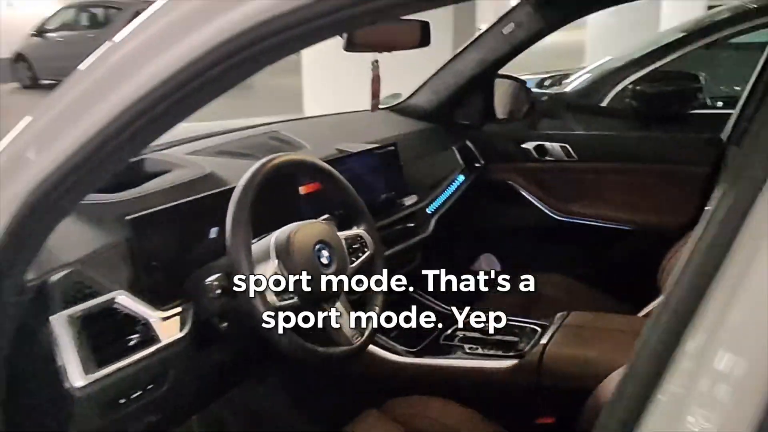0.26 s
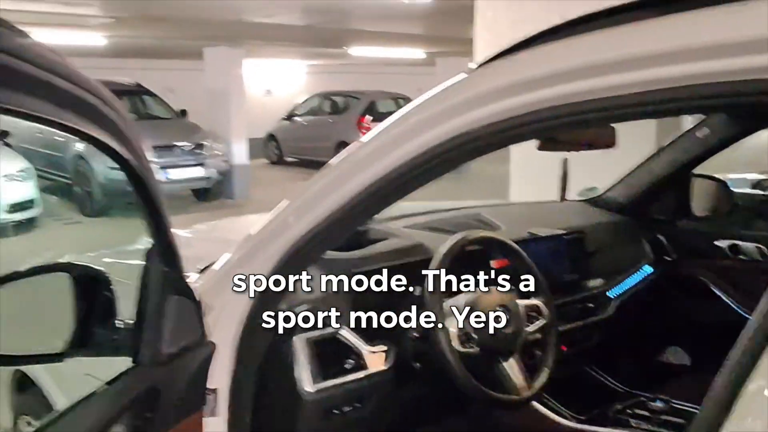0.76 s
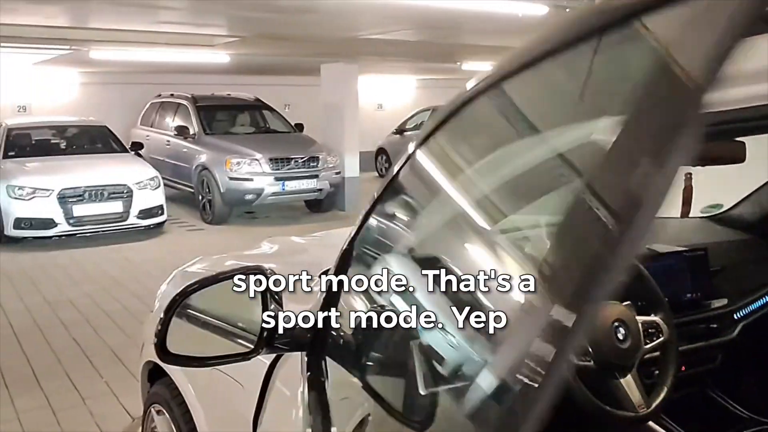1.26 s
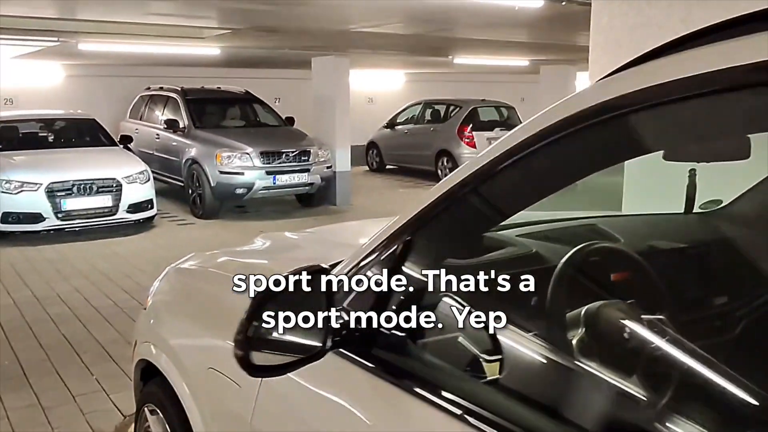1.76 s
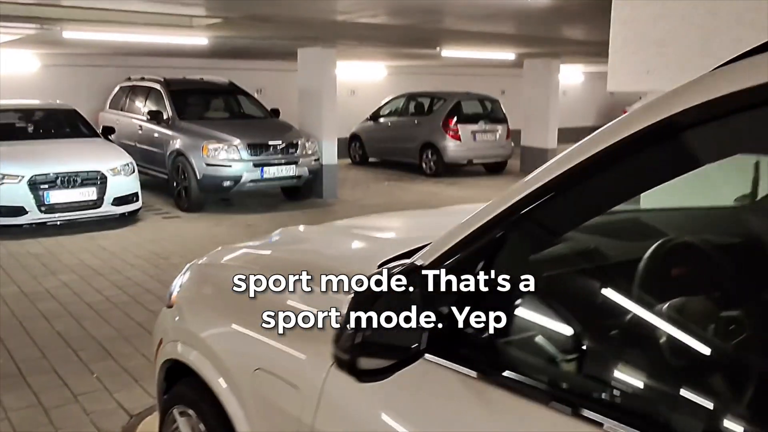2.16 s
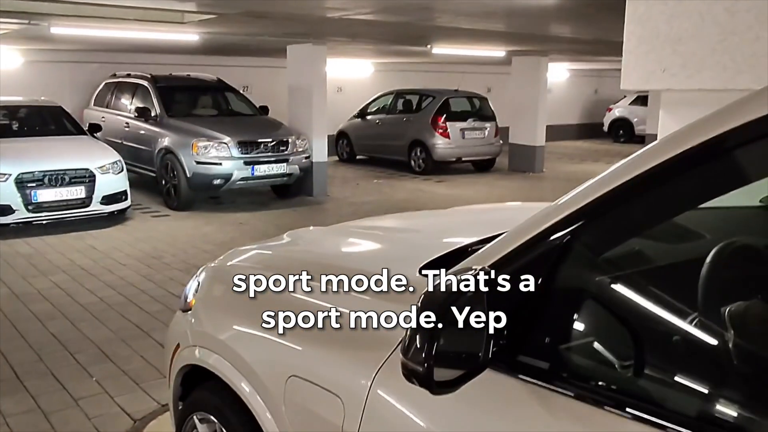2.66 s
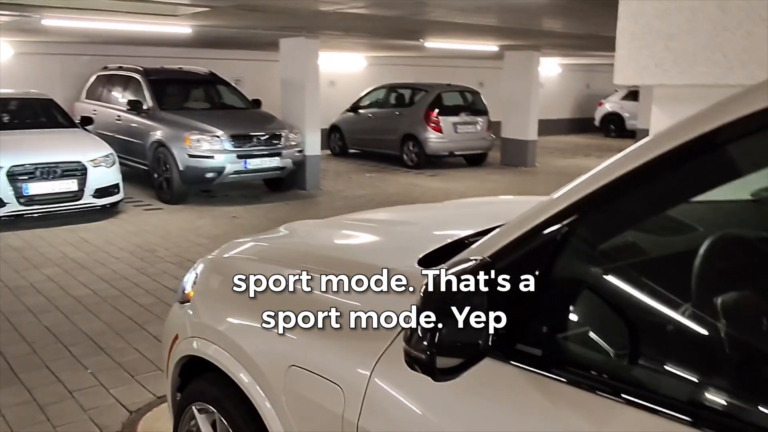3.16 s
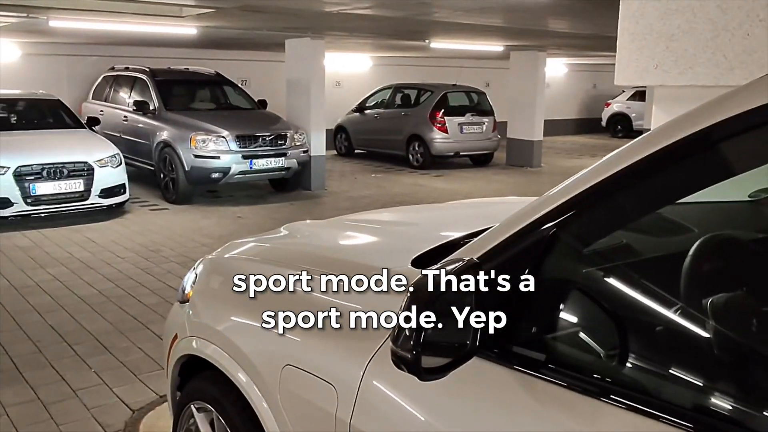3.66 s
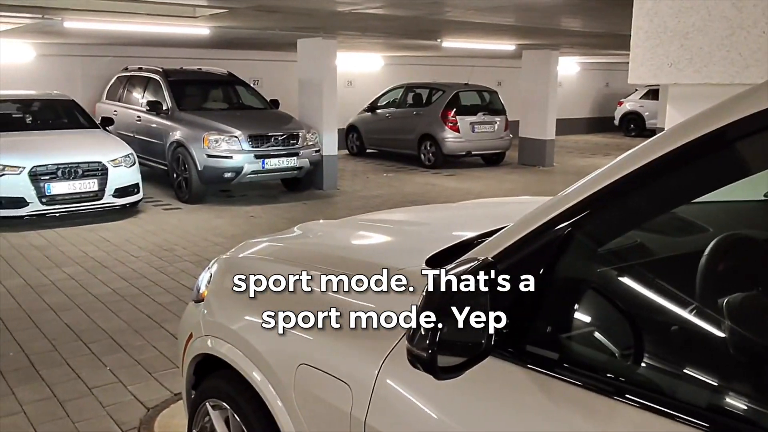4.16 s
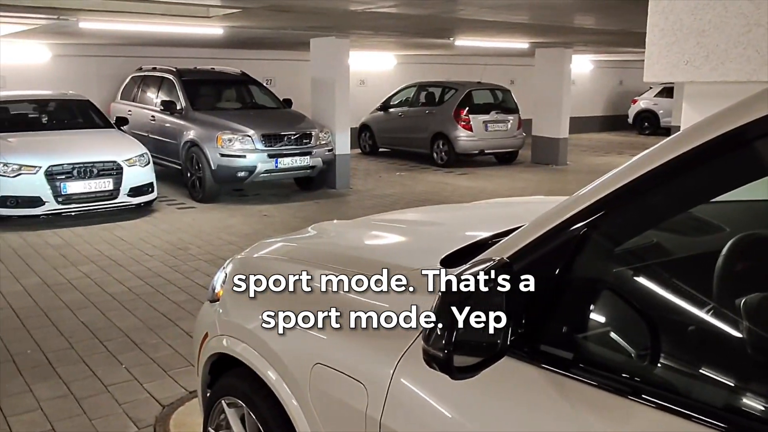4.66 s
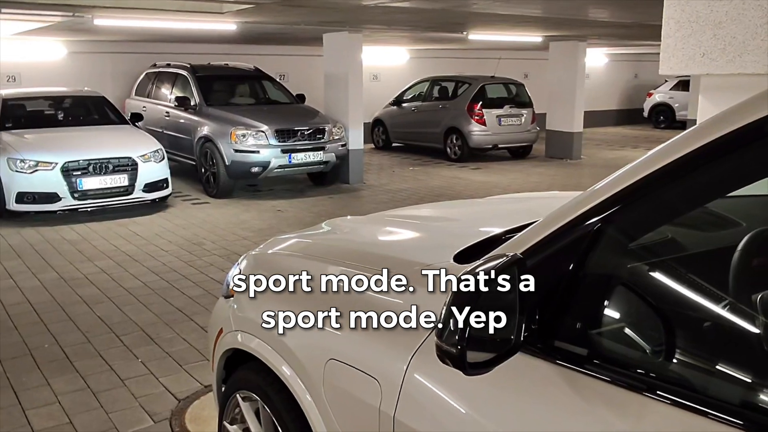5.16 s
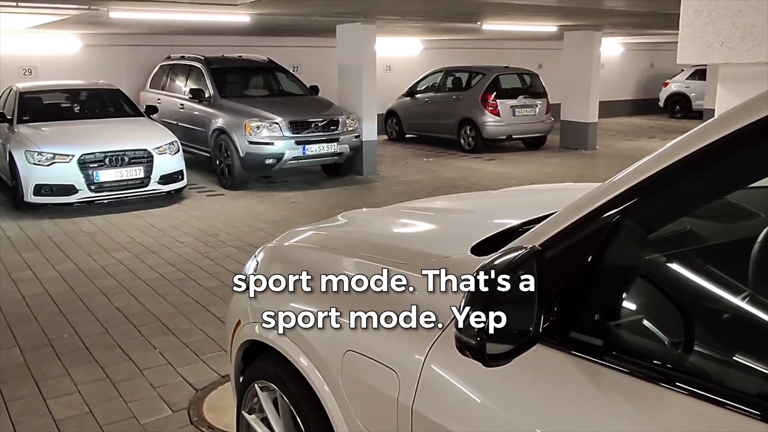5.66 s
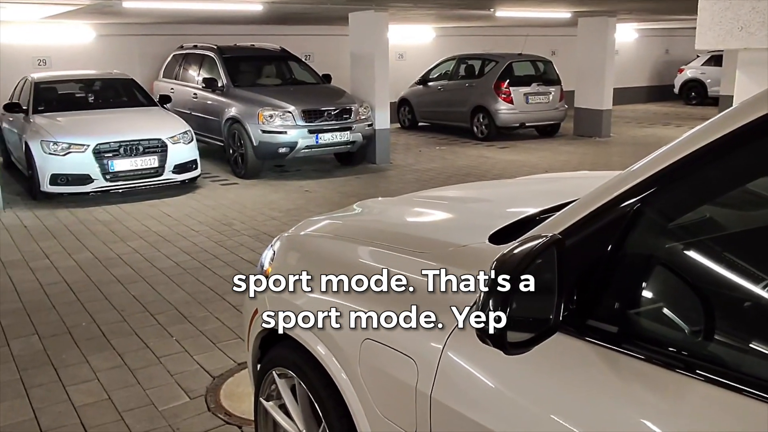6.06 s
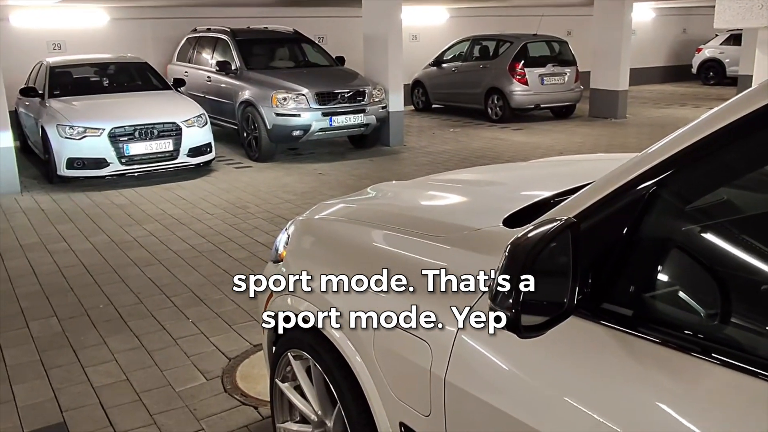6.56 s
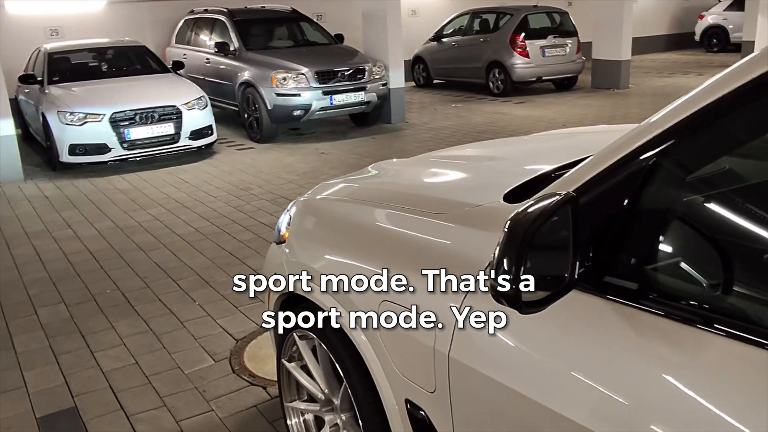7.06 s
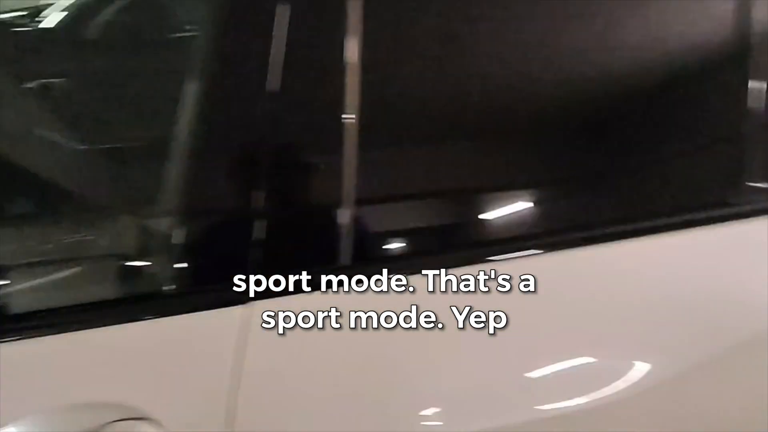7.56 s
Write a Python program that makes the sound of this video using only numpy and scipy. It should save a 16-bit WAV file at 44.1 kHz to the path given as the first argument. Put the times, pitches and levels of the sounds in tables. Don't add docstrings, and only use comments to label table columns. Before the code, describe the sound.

Small handling knocks and scuffs, one heavy car door slam, a faint low hum and clunk, then a mechanical air compressor whining to the end.

```python
import sys
import numpy as np
from scipy import signal
from scipy.fft import rfft, irfft, next_fast_len
from scipy.io import wavfile
from scipy.ndimage import map_coordinates

SR = 44100
rng = np.random.default_rng(int(sys.argv[2]) if len(sys.argv) > 2 else 0)


def output_pcm(signal):
    pcm = np.clip(np.atleast_2d(signal).T, -1, 1) * 32767
    wavfile.write(sys.argv[1], SR, np.round(pcm).astype(np.int16))


def invert_db(x):
    u = np.asarray(x, float) / 20
    return 10 ** u


N = 343980

# pitch_hz, level_db_per_hz
HISS = [(120, -41.5), (200, -18.5), (240, -12), (621, -6.5), (1270, -10), (1410, -11.5), (1640, -10),
        (4480, -12), (6690, -11), (9300, -22), (10600, -33.5), (12500, -15.5), (15800, -19)]
HISS_DB = -70.5
# start_s, level_db
BACKGROUND_LEVEL = [(0, 2), (2.56, -2.4), (2.63, -2.5), (2.9, 2), (3.1, 0.2), (7.8, 1.2)]
# pitch_hz, likeness_0_to_1
ALIKE = [(60, 0.19), (240, 0.11), (950, 0.19), (3770, 0.0086), (15000, 0.049)]
# pitch_hz, level_db
LEAN = [(60, -8.5), (950, 0), (3770, -2), (15000, -1)]
# pitch_hz, fade_60db_s
GARAGE = [(60, 0.36), (300, 0.28), (2000, 1), (4500, 0.65), (12000, 0.03)]
# pitch_hz, fade_60db_s
UNDERSIDE = [(300, 0.29), (1500, 0.96), (6000, 0.0065)]
# pitch_hz, level_db
PORTS = [(20, 5.5), (7500, -3.5), (9500, -14.5), (10800, -26), (11900, -11), (13000, -11.5), (16000, -12.5)]
# start_s, left_minus_right_db
CAMERA_SWING = [(3.05, -1), (3.33, -1), (4.37, -2), (7.11, -1), (7.24, 0.5), (7.6, 7.5), (7.8, 6.5)]

# peak_s, rise_s, fall_s, rumble_db, shuffle_db
MOVES = [(0.1, 0.69, 0.37, -60.5, -72.5), (0.7, 0.42, 0.12, -55.5, -60.5), (1.15, 0.32, 0.37, -57, -65),
         (1.76, 0.053, 0.2, -37.5, -38.5), (1.92, 0.048, 0.106, -60.5, -53), (2.1, 0.5, 0.57, -54, -69.5),
         (2.38, 0.29, 0.29, -64.5, -71.5), (2.57, 0.26, 0.041, -62.5, -71),
         (3.05, 0.44, 0.56, -71.5, -72.5), (4.33, 0.41, 0.47, -62.5, -71.5), (5.04, 0.31, 0.53, -66, -59),
         (5.4, 0.33, 0.27, -82, -72), (6.1, 0.36, 1, -79, -76.5), (7.06, 0.61, 0.45, -73.5, -74),
         (7.75, 0.4, .5, -70.5, -80.5)]
REST_RUMBLE_DB, REST_SHUFFLE_DB = -77, -79
# peak_s, rise_s, fall_s, level_db, dull_part_db
SCUFFS = [(0.03, 0.95, 0.26, -60, 10.5), (0.237, 0.083, 0.086, -52.5, -40),
          (0.395, 0.023, 0.083, -49.5, -29), (.447, 0.12, 0.012, -64, -20), (1.93, 0.12, 0.32, -66, 8),
          (2.19, 0.059, 0.036, -70.5, -14), (2.35, 0.31, 0.25, -68.5, 12), (2.47, 0.11, 0.5, -66.5, 9)]
# pitch_hz, level_db_per_hz
SCUFF_BRIGHT = [(290, -78), (500, -6), (944, -25), (1040, -6.5), (1480, -5), (2090, -5.5), (6450, -4.5),
                (10400, -21), (13100, -15), (15800, -11.5)]
# pitch_hz, level_db_per_hz
SCUFF_DULL = [(300, -32.5), (600, -3), (850, 4.5), (1200, -8.5), (2000, -38.5)]
# pitch_hz, level_db_per_hz
SHUFFLE = [(59, -25), (100, -3), (306, -7), (513, -16.5), (600, -18.5), (780, -33), (1320, -120)]
# pitch_hz, level_db_per_hz
RUMBLE = [(15, -48), (32, -7.5), (50, 12.5), (113, 0.5), (150, -6), (200, -50)]

# start_s, level_db, pitch_hz, fade_60db_s
BUMPS = [(1.061, -31.5, 179, 0.14), (1.09, -45, 75.6, 0.34), (1.337, -42.5, 170, .1), (0.601, -49, 62, .5),
         (.688, -58, 70, .3), (1.419, -54, 915, 0.089), (1.766, -19.5, 110, 0.18), (4.238, -38.5, 71, 0.26),
         (4.915, -43.5, 95, 0.13), (5.03, -58, 280, 0.42), (5.09, -62, 70, 0.18), (1.6, -58, 160, 0.22),
         (4.9, -59, 308, .5), (4.9, -59, 214, 0.49)]

# start_s, thud_db, knock_db, knock_hz, click_db
TAPS = [(0.379, -51, -42, 1280, -68), (0.392, -56, -57, 1170, -39), (0.411, -45.5, -47, 1330, -59),
        (0.445, -64, -67, 1490, -44), (0.587, -59, -39, 396, -48), (0.595, -39.5, -34, 480, -38),
        (0.681, -47, -56, 1080, -43.5), (0.756, -58, -47.5, 920, -47.5), (1.009, -62, -40, 360, -50),
        (1.219, -63, -56.5, 557, -62.5), (1.415, -58, -55.5, 870, -55.5), (1.418, -48.5, -44.5, 850, -45.5),
        (2.187, -48, -75, 462, -58), (2.48, -50, -58.5, 986, -56.5), (2.913, -46.5, -68, 367, -53.5),
        (1.343, -44, -42.5, 353, -52), (2.971, -41.5, -46.5, 415, -51), (4.849, -42, -57, 607, -56)]
# start_s, thud_db, knock_db, knock_hz
THUMPS = [(0.026, -55, -52, 357), (0.865, -98, -48, 410), (0.99, -45, -48, 389), (1.012, -42, -46, 359),
          (1.058, -37, -37.5, 353), (1.065, -32, -29, 596), (1.331, -44.5, -48.5, 440),
          (1.363, -49, -50.5, 333), (1.753, -30.5, -9.5, 493), (1.763, -17.5, -12.5, 530),
          (1.577, -42.5, -78.5, 368.8), (1.606, -42.5, -67.5, 353)]
# start_s, thud_db, knock_db, knock_hz
CLUNKS = [(2.946, -37.5, -50, 357), (3.027, -44.5, -47, 349), (3.045, -47.5, -67, 487),
          (4.18, -42, -59.5, 350), (4.227, -37.5, -45, 266), (4.24, -34.5, -36.5, 296),
          (4.251, -42, -46, 650), (4.277, -43, -66, 250), (4.916, -42.5, -43.5, 307),
          (5.438, -50, -68, 624)]
THUMP_CLICK_DB, CLUNK_CLICK_DB = -40, -15.5
# start_s, peak_db, pitch_hz, fade_60db_s
TICKS = [(0.391, -60, 5600, 0.038), (0.595, -34, 7950, 0.018), (0.681, -37.5, 5800, 0.084),
         (0.7545, -37, 5430, 0.028), (.799, -55, 3200, 0.022), (.984, -58, 3100, 0.026),
         (1.0194, -63, 4160, 0.035), (1.066, -48.5, 1900, 0.078), (2.972, -56, 1900, .07),
         (1.246, -53.5, 3120, 0.031), (1.411, -54, 4000, 0.068), (1.419, -49.5, 4290, 0.044),
         (1.746, -25, 5670, 0.026), (1.7628, -18.5, 6450, 0.041), (1.9544, -53, 4990, 0.064),
         (2.183, -48, 3970, 0.063), (2.9144, -49, 4050, 0.051), (2.9282, -41.5, 4430, 0.046),
         (4.8484, -62, 5460, 0.096), (6.331, -45.5, 6450, 0.12)]
# start_s, peak_db, fade_60db_s
METAL_SNAPS = [(1.772, -28, 0.041), (1.784, -29.5, 0.078), (1.817, -42, 0.05), (1.952, -40.5, 0.044),
               (2.9274, -38, 0.054)]
# start_s, level_db, pitch_hz
PUSHES = [(1.0654, -34, 517), (1.343, -50, 446), (1.7571, -10, 475), (2.972, -49, 1396),
          (4.852, -45.5, 525)]

# start_s, length_s, pitch_hz, level_db, sag_db_per_s, release_s
HUM = [
    (2.128, 0.9, 118.6, -56.5, -1.5, .05),
    (4.227, 0.47, 118.6, -53.5, 19, 0.21),
]
HUM_RISE_S, HUM_WAVER_HZ, HUM_WAVER_DB = .07, .8, .7
# start_s, level_db
BLEED = [(4.82, -90), (4.85, -58.5), (4.95, -64), (5.2, -64), (5.3, -69), (5.36, -88)]
# pitch_hz, width_hz, level_db
NOZZLE = [(704, 600, 7), (2480, 340, 9.5)]

# start_s, turns_per_s
SHAFT = [(3.085, 33.4), (3.187, 41.5), (3.297, 46.6), (3.408, 51.3), (3.604, 59.5), (3.7, 59.45),
         (3.93, 58.6), (4.36, 57.7), (4.58, 57.3), (5.0, 56.85), (5.5, 56.25), (6.03, 55.7), (6.3, 55.4),
         (6.45, 54.3), (6.54, 54.0), (6.66, 54.6), (6.79, 54.8), (7.25, 54.42), (7.57, 53.8), (7.8, 53.7)]
FULL_SPEED = 57
FIRST_SNAP_S, FILL_FROM_S, FILL_S = 3.0825, 4.75, 2
# start_s, level_db
HOUSING_LEVEL = [(3.09, -71), (3.2, -69.5), (3.31, -66.5), (3.42, -59.5), (3.61, -56), (3.75, -58.5),
                 (3.93, -58), (4.36, -57.5), (4.58, -57), (5.0, -58.5), (5.5, -62.5), (6.03, -60),
                 (6.3, -63.5), (6.54, -64), (6.7, -62), (7.25, -59), (7.55, -63.5), (7.8, -62.5)]
# pitch_hz, width_hz, level_db
HOUSING = [(1132, 25.5, 5), (1176, 15.3, -4)]
BRACKET = [(882.5, 31, -5), (980.3, 32, 3.5), (1059, 57, -2.5), (931, 22, -7.5)]
CRANKCASE = [(1312, 30, 0.5), (1372, 39, -1), (1401, 32, -6.5), (1452, 35, -10.5), (1242, 16, -9)]
COVER = [(1810, 40, -5), (1863, 30, -4), (1958, 50, -1), (2012, 37, -8.5), (2112, 36, -6.5),
         (2170, 36, -4.5)]
SHIELD = [(1588, 50, -7), (1603, 31, -3), (1700, 36, -7.5), (1746, 32, -3), (1919, 39, -3.5)]
TANK = [(410, 31, -12.5), (466, 21, -12), (510, 41, -20.5), (557, 40, -7), (629, 32, 3), (684, 29, 0),
        (720, 56, -7), (797, 40, -16), (828, 66, -13)]
FINS = [(2362, 21, -5.5), (2427, 25, -5.5), (2540, 16, 1), (2678, 31, -1), (2877, 25, -1), (2920, 30, 0.5),
        (3100, 54, -1.5)]
HEAD = [(3370, 54, 1.5), (3510, 18, 3.5), (3686, 66, -1), (4000, 41, -3), (4070, 28, -14), (4290, 24, 2),
        (4530, 37, -1), (4690, 23, 5), (5190, 63, -1), (5270, 32, -23), (5550, 27, -2.5), (5750, 20, -6)]
FLANGE = [(1184, 30, -1.5), (1240, 32, -8.5)]
# modes, full_speed_db, db_per_speed_doubling, full_pressure_db, blow_travel_s,
# db_per_db_of_camera_swing
PARTS = [
    (BRACKET, -61, 22.3, 0.77, 0.0093, 0),
    (CRANKCASE, -60.5, 18, -1.7, 0.004536, 0),
    (COVER, -66, 18, 3.65, 0.003038, -0.5),
    (SHIELD, -65, 21, -13.5, 0.00196, 0),
    (TANK, -69, 25, 3.5, 0.0012, 0),
    (FINS, -64.5, 10, -0.29, .0065, 0.37),
    (HEAD, -64.5, 16.5, 1, .011, 0.24),
    (FLANGE, -77, 15, 14, 0.00296, -.2),
]
# start_s, bracket_db, crankcase_db, cover_db
PART_LEVEL = [(3.1, 4.5, 5, 4), (3.199, 1, 1, 2.5), (3.35, -2, -3, -4), (3.62, -6, -1, 0),
              (3.85, -1.5, 0.5, 1), (4.071, 2, -0.5, -0.5), (4.35, 0, -3, .3), (4.75, -1, .3, -2),
              (5.2, -1, 2, -1), (5.6, 0.5, 1.3, -1.5), (5.9, 0.3, -0.5, 0), (6.381, 0.2, -1.5, 1.5),
              (6.5, 0, 2, 1.5), (6.8, -1, 2.5, 1.5), (7.28, -1, 3, 3), (7.48, -1, 0, -2),
              (7.8, -1.3, -1.5, -0.5)]
# start_s, level_db
FINS_HEAD_LEVEL = [(3.1, 0), (3.5, 1.5), (3.8, 1), (4.3, -0.5), (5, 0), (6.2, 1), (6.9, 1.5), (7.15, 1.5),
                   (7.33, 3.5), (7.5, 0), (7.8, -.5)]
# pitch_hz, level_db_per_hz
INTAKE = [(250, -18), (550, -15.5), (800, -24), (1200, -10.5), (1550, -16), (2300, -18.5), (4050, -26),
          (4800, -23), (7000, -25.5), (9500, -37.5), (12400, -89)]
AIR_DB, AIR_GROWS = -63.5, 12

# start_s, peak_db, crack_db
SLAM = [
    (1.733, -21.5, -23.5),
    (1.742, -10, -42),
    (1.745, -1, -24.5),
    (1.751, -3.5, -23),
    (1.756, 0, -28.5),
    (1.762, -4.5, -27),
    (1.771, -7.5, -16.5),
    (1.788, -13, -30),
]
# pitch_hz, level_db, fade_60db_s
PANEL = [(198, -7, 0.24), (333, 0.5, 0.038), (488, -3, 0.19), (573, -9.5, 0.058), (594, -4.5, 0.1),
         (630, -52.5, .3), (728, -34.5, 0.083), (1060, -16, 0.16), (1680, -27.5, 0.09), (2080, -29.5, .1),
         (2410, -28.5, .1), (3800, -32.5, 0.059), (5440, -28.5, .06), (6800, -31, 0.073)]
# pitch_hz, level_db_per_hz
BLOW = [(20, -38.5), (40, -14), (62, -12), (85, -16), (135, -1), (300, -12.5), (520, -5), (750, -20.5),
        (1500, -20.5), (2500, -20.5), (4000, -36.5), (6500, -49.5), (15500, -72)]
# pitch_hz, fade_60db_s
BLOW_FADE = [(40, .5), (120, 0.31), (500, 0.077), (2000, 0.074), (6000, 0.11), (12000, 0.034)]
# pitch_hz, level_db, fade_60db_s
CABIN = [(32.9, -27, 0.93), (47.7, -22, 0.46), (62.7, -17.5, 0.44), (99.8, -16, .25), (110, -20, 0.22),
         (128.5, -18.5, .35), (146.3, -18.5, 0.33), (649, -55, 1.22)]
SHUT_S = 1.756


def unit(x):
    return x / np.sqrt(np.mean(x ** 2) + 1e-20)


def along(points, hz):
    f, v = np.transpose(points)
    return np.interp(np.log(hz + 1), np.log(f + 1), v)


def curves(rows):
    s, *columns = np.transpose(rows)
    return [np.interp(np.arange(N) / SR, s, column) for column in columns]


def during(rows, fade):
    first, last = rows[0][0], rows[-1][0]
    return np.interp(np.arange(N) / SR, [first - fade, first, last, last + fade], [0, 1, 1, 0])


def wobble(rate):
    knots = rng.standard_normal(int(N * rate / SR) + 4)
    return map_coordinates(knots, [np.arange(N) * rate / SR])


def filtered(x, response):
    m = next_fast_len(x.shape[-1] + 8192)
    spectrum = rfft(x, m) * response(np.fft.rfftfreq(m, 1 / SR))
    return irfft(spectrum, m)[..., :x.shape[-1]]


def resonances(modes):
    def mode(f, c, w, db):
        return invert_db(db) * 1j * f * w / (c * c - f * f + 1j * f * w)
    return lambda f: sum((-1) ** k * mode(f, *row) for k, row in enumerate(modes))


def rush(spectrum, alike):
    def response(hz):
        turn = np.arccos(np.clip(along(alike, hz), -1, 1)) / 2
        return invert_db(along(spectrum, hz)) * [np.cos(turn), np.sin(turn)]
    mid, side = filtered(rng.standard_normal((2, N)), response)
    return unit(np.array([mid + side, mid - side]))


def fading(decays, spectrum, seconds):
    hz, t, z = signal.stft(rng.standard_normal((2, int(seconds * SR))), SR, nperseg=256)
    level_db = along(spectrum, hz)[:, None] - 60 * t / along(decays, hz)[:, None]
    tail = signal.istft(z * invert_db(level_db), SR, nperseg=256)[1]
    return tail / np.linalg.norm(tail[0])


def burst(out, s, db, hz, width, t60):
    t = np.arange(SR // 4) / SR
    band = resonances([(hz, width, 0)])
    noise = rng.standard_normal((2, len(t)))
    mid, side = filtered(noise, lambda f: band(f) ** 2 * invert_db(along(PORTS, f)))
    spread = np.clip(hz / 8000, 0, 1)
    shape = invert_db(db - 60 * t / t60) * (1 - np.exp(-t * hz * 3.3))
    sound = shape * unit(np.array([mid + spread * side, mid - spread * side]))
    return np.pad(sound, ((0, 0), (round(s * SR), N)))[:, :N] + out


def swell(s, rise, fall, db):
    t = np.arange(N) / SR - s
    return invert_db(db - 20 * np.where(t < 0, -t / abs(rise), t / abs(fall)))


def garage_echo(x, start, decays=GARAGE):
    tail = fading(decays, [(20, 0)], 0.93)
    tail = np.pad(tail, ((0, 0), (int(start * SR), 0)))
    return signal.fftconvolve(x[None], tail, axes=1)[:, :N]


def still_air():
    level = invert_db(HISS_DB + curves(BACKGROUND_LEVEL)[0] + 0.88 * wobble(2.5))
    return level * rush(HISS, [(300, 0.27), (3000, 0.12), (12000, 0.12)])


def person():
    rumble, shuffle = invert_db(REST_RUMBLE_DB), invert_db(REST_SHUFFLE_DB)
    for s, rise, fall, rumble_db, shuffle_db in MOVES:
        rumble = rumble + swell(s, rise, fall, rumble_db)
        shuffle = shuffle + swell(s, rise, fall, shuffle_db)
    out = rumble * invert_db(1.4 * wobble(10)) * rush(RUMBLE, [(50, 0.7)])
    out += shuffle * invert_db(2.6 * wobble(25)) * rush(SHUFFLE, [(200, 0.083)])
    bright = rush(SCUFF_BRIGHT, [(1000, 0.27), (8000, 0.19)])
    dull = rush(SCUFF_DULL, [(800, 0.31)])
    grain = invert_db(0.77 * wobble(170))
    for s, rise, fall, db, dull_db in SCUFFS:
        out += swell(s, rise, fall, db) * grain * (bright + invert_db(dull_db - 17) * dull)
    return out


def deep_thuds():
    out, t = np.zeros(N), np.arange(SR // 2) / SR
    for s, db, hz, t60 in BUMPS:
        tone = invert_db(db - 60 * t / t60) * np.sin(2 * np.pi * hz * t)
        out[round(s * SR):][:len(t)] += tone * (1 - np.exp(-t / 0.0027))
    return out


def knocks():
    out = np.zeros((2, N))
    padded = [(*row, row[1] + THUMP_CLICK_DB) for row in THUMPS]
    clunks = [(*row, row[1] + CLUNK_CLICK_DB) for row in CLUNKS]
    for s, thud_db, knock_db, hz, click_db in TAPS + padded + clunks:
        out = burst(out, s, thud_db - 8.0, 140, 150, 0.17)
        out = burst(out, s, knock_db - 5.5, hz, 0.38 * hz + 30, 0.063)
        out = burst(out, s, click_db - 8.5, 1700, 2700, 0.082)
    for s, db, hz, t60 in TICKS:
        out = burst(out, s, db - 12, hz, 3600, abs(t60) + 0.0039)
        out = burst(out, s, db - 17.0, 15000, 12000, abs(t60) + 0.0045)
    for s, db, t60 in METAL_SNAPS:
        out = burst(out, s, db - 9.5, 16000, 5000, t60)
    t = np.arange(SR // 10) / SR
    for s, db, hz in PUSHES:
        push = 3 * invert_db(db - 18.4 * t * hz) * np.sin(2 * np.pi * hz * t)
        out[:, round(s * SR):][:, :len(t)] += push
    return out


def valve():
    out, t = np.zeros(N), np.arange(N) / SR
    for s, length, hz, db, sag_db, release in HUM:
        turn = 2 * np.pi * np.cumsum(hz + HUM_WAVER_HZ * wobble(11.3)) / SR
        held = np.clip(np.minimum((t - s) / HUM_RISE_S, (s + length - t) / release), 0, 1)
        level = invert_db(db - sag_db * (t - s) + HUM_WAVER_DB * wobble(9.5))
        out += held * level * (np.sin(turn) + 0.037 * np.sin(2 * turn))
    jet = unit(filtered(rng.standard_normal(N), lambda f: resonances(NOZZLE)(f) ** 2))
    return out + during(BLEED, .01) * invert_db(curves(BLEED)[0]) * jet


def compressor():
    speed, housing_db = curves(SHAFT)[0], curves(HOUSING_LEVEL)[0]
    swing_db = curves(CAMERA_SWING)[0]
    on = during(SHAFT, 0.0095)
    pressure = np.clip((np.arange(N) / SR - FILL_FROM_S) / FILL_S, 0, 1)
    effort = np.log2(speed / FULL_SPEED)
    turn = 2 * np.pi * np.cumsum(speed) / SR + 0.0015 * wobble(30)
    turn = turn - turn[round(FIRST_SNAP_S * SR)]
    snaps = np.exp(9000 * (np.cos(turn) - 1)) * invert_db(0.19 * wobble(50))

    def ring(modes, late=0):
        blow = resonances([(1500, 12000, 0)])
        part = resonances(modes)
        return unit(filtered(snaps, lambda f: part(f) * blow(f) * np.exp(-2j * np.pi * f * late)))

    swing = np.clip(swing_db, 0, None)
    body = invert_db(housing_db) * ring(HOUSING)
    part_levels = curves(PART_LEVEL) + [0, 0] + 2 * curves(FINS_HEAD_LEVEL) + [0]
    for (modes, db, grows_db, full_db, late, shade), part_db in zip(PARTS, part_levels):
        level_db = db + grows_db * effort + full_db * pressure + shade * swing + part_db
        body = body - invert_db(level_db) * ring(modes, late)
    body = on * body
    puffs = 1 + 0.18 * np.cos(turn - 1.2) + 0.033 * np.cos(2 * turn)
    air_level = invert_db(AIR_DB + AIR_GROWS * effort + 1.83 * wobble(12))
    air = on * air_level * puffs * rush(INTAKE, ALIKE)
    heard = body + invert_db(-16) * garage_echo(body, .002, UNDERSIDE)
    heard = heard + invert_db(-19) * garage_echo(body, .02) + air
    heard = heard * invert_db(swing_db * [[.5], [-.5]])
    delay = 5.5 / SR * np.array([[-.5], [.5]])
    return filtered(heard, lambda hz: invert_db(along(LEAN, hz) * [[.5], [-.5]])
                    * np.exp(2j * np.pi * hz * delay))


def door():
    out, t = np.zeros((2, N + SR)), np.arange(SR) / SR
    latch = resonances([(6000, 5000, 0)])
    for s, db, crack_db in SLAM:
        ring = 0
        for hz, level, t60 in PANEL:
            ring = ring + invert_db(level + rng.normal(0, 2.1) - 60 * t / t60) * np.sin(2 * np.pi * hz * t)
        ring = invert_db(-10.5) * ring * (1 - np.exp(-t / 0.00096))
        mid, side = fading(BLOW_FADE, BLOW, 1)[:, :SR]
        side = filtered(side, lambda f: f ** 2 / (f ** 2 + 1500 ** 2))
        thud = 12 * np.array([mid - 0.18 * side, mid + 0.18 * side]) * (1 - np.exp(-t / 0.00029))
        noise = rng.standard_normal((2, SR)) * invert_db(-60 * t / 0.068)
        crack = filtered(noise, lambda f: latch(f) * invert_db(along(PORTS, f)))
        crack = invert_db(crack_db + 14.5) * crack * invert_db([[-4], [4]])
        out[:, round(s * SR):][:, :SR] += invert_db(db - 13.0) * (ring + thud + crack)
    boom = sum(invert_db(level - 60 * t / t60) * np.sin(2 * np.pi * hz * t) for hz, level, t60 in CABIN)
    out[:, round(SHUT_S * SR):][:, :SR] += boom * (1 - np.exp(-t / 0.004))
    return out[:, :N]


def scene():
    small, slam = knocks(), door()
    slam_without_bass = filtered(slam.mean(0), lambda f: 1j * f / (150 + 1j * f))
    walls = invert_db(-20.5) * garage_echo(small.mean(0), 0.012)
    walls = walls + invert_db(-23.0) * garage_echo(slam_without_bass, .02)
    return still_air() + person() + deep_thuds() + small + valve() + compressor() + slam + walls


def band_limit(x):
    return signal.sosfilt(signal.butter(12, 16440, fs=SR, output="sos"), x)


def record(dry):
    mix = filtered(dry, lambda hz: hz < 15600)
    return band_limit(mix)


dry = scene()
out = record(dry)
output_pcm(out)
```